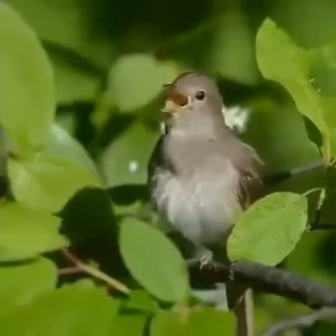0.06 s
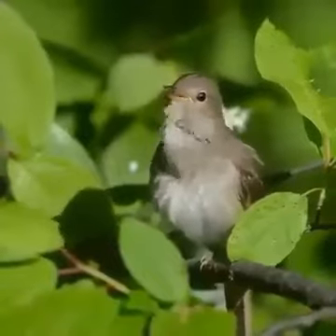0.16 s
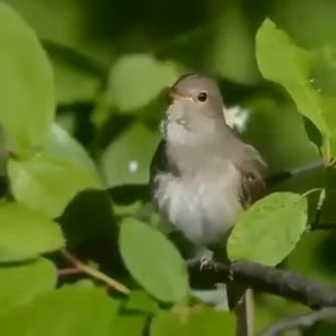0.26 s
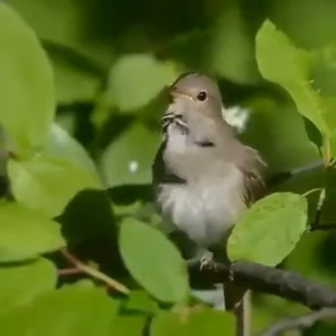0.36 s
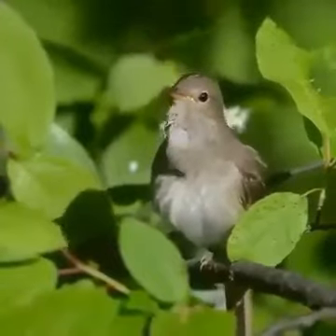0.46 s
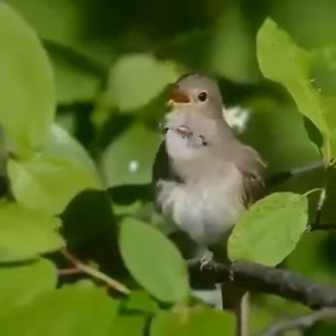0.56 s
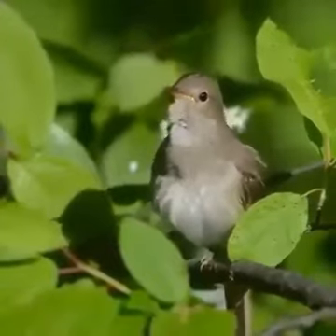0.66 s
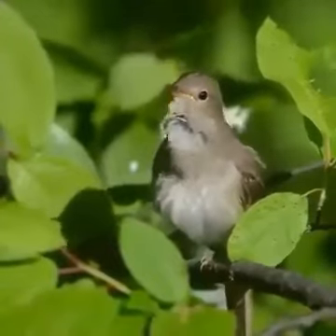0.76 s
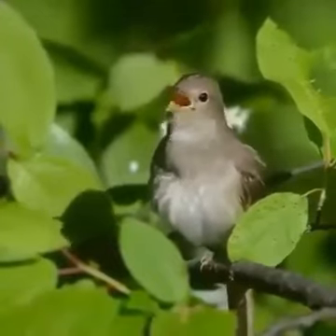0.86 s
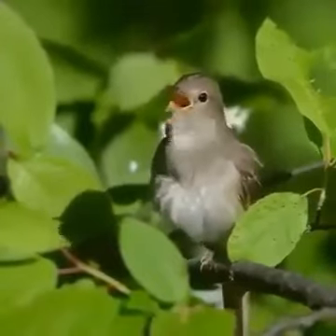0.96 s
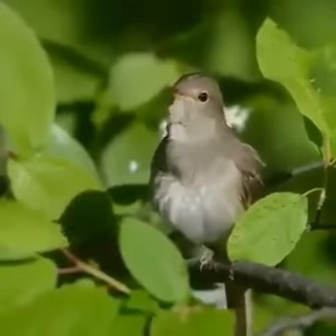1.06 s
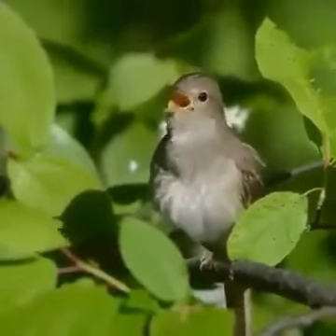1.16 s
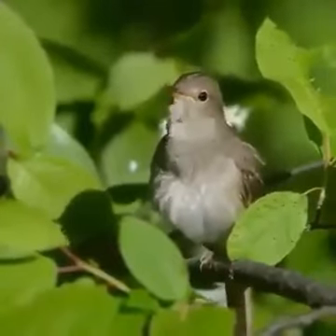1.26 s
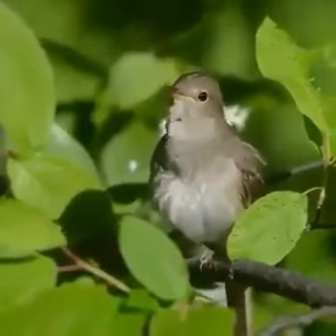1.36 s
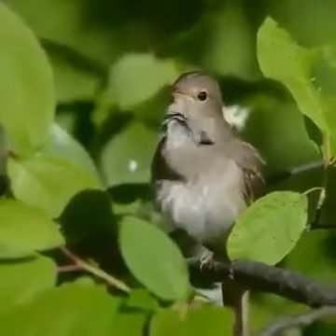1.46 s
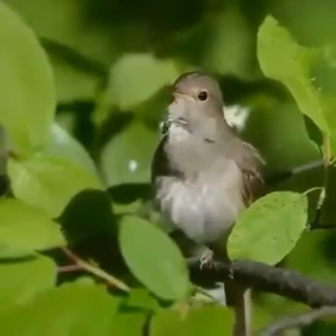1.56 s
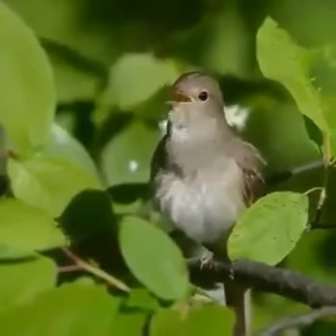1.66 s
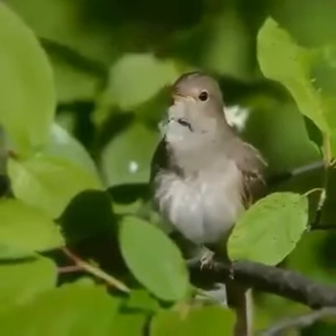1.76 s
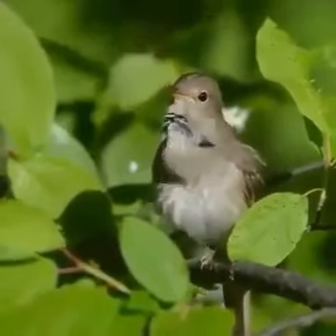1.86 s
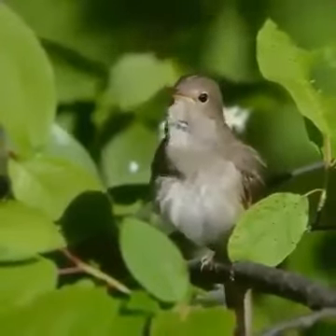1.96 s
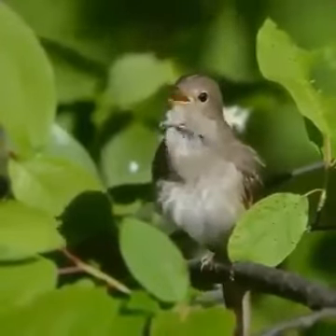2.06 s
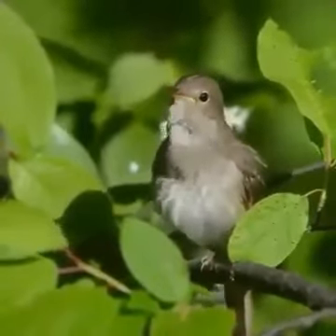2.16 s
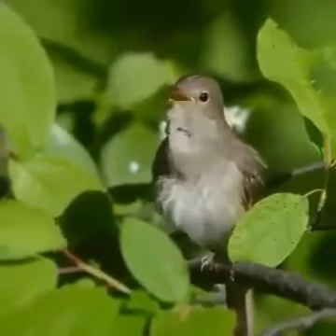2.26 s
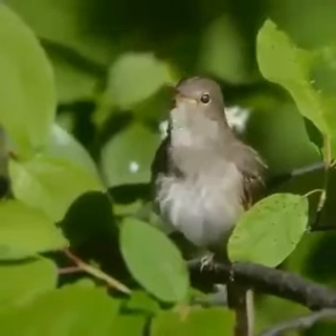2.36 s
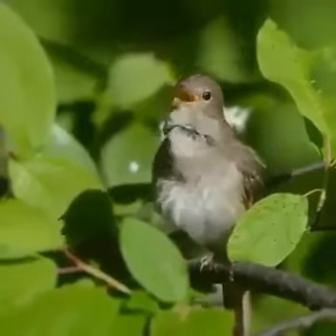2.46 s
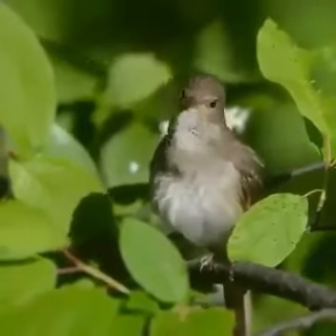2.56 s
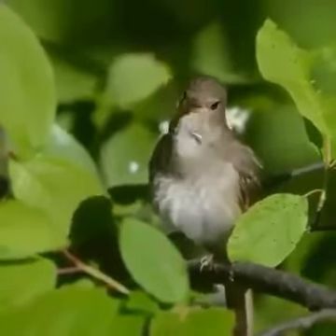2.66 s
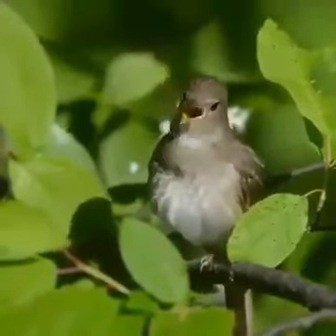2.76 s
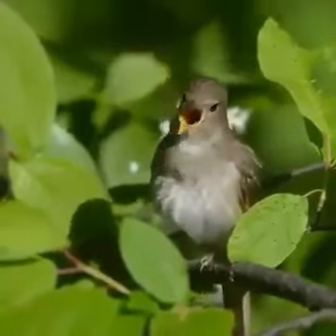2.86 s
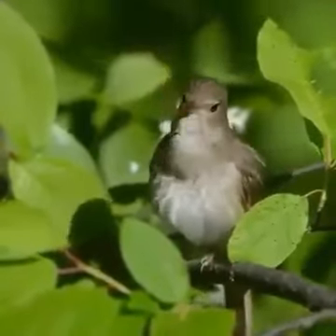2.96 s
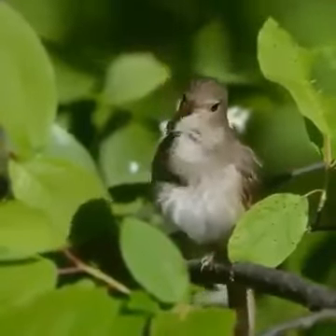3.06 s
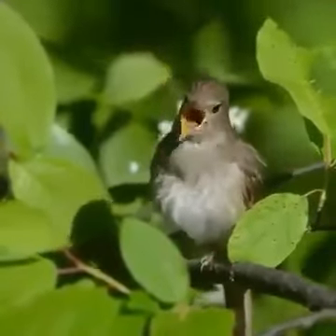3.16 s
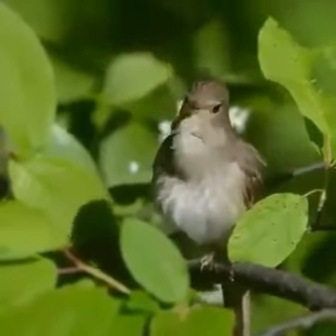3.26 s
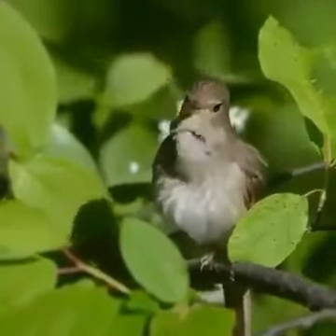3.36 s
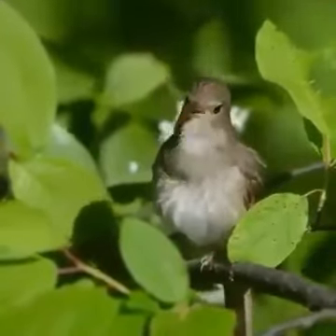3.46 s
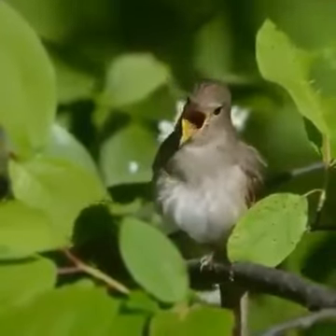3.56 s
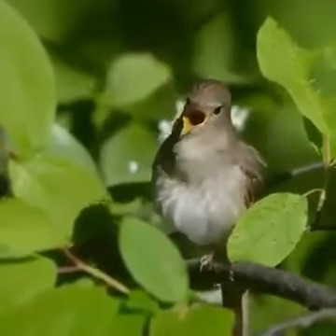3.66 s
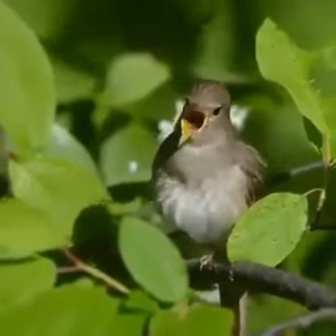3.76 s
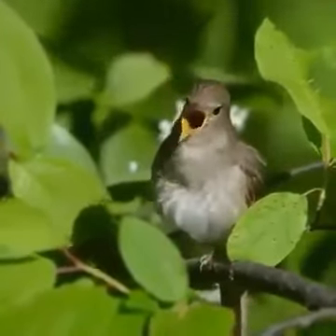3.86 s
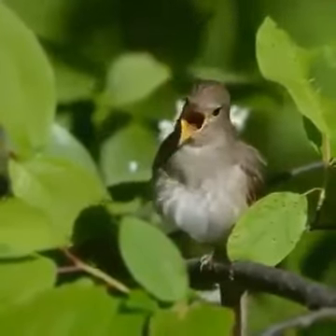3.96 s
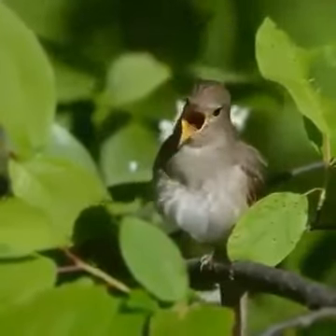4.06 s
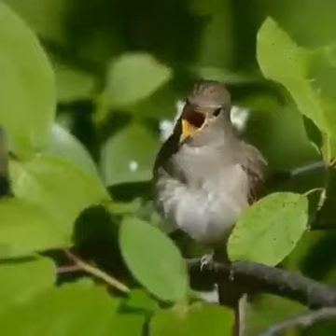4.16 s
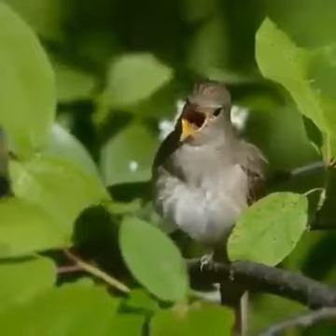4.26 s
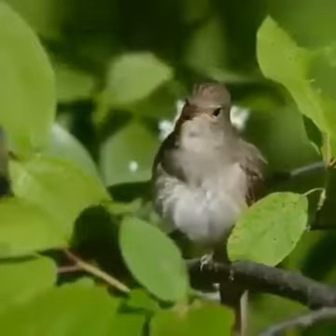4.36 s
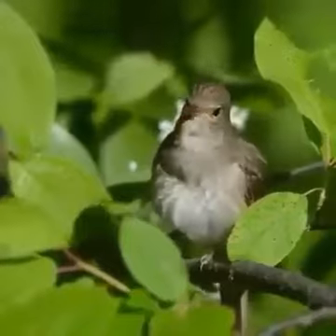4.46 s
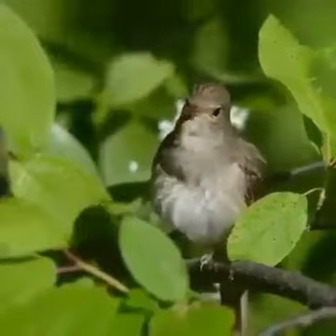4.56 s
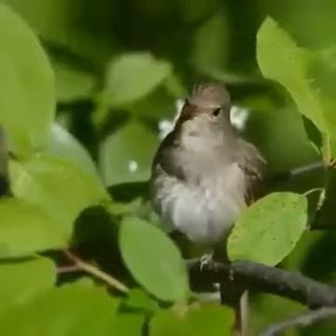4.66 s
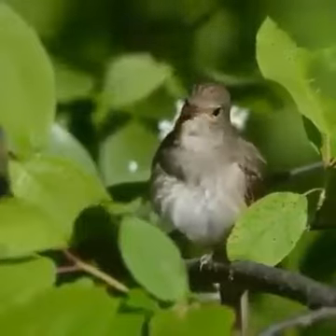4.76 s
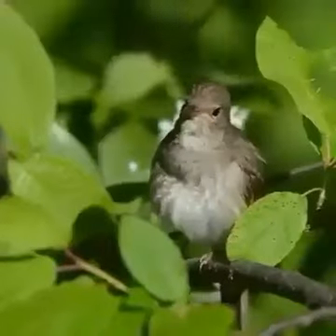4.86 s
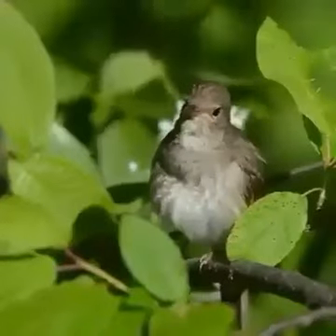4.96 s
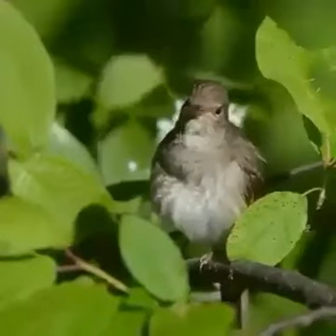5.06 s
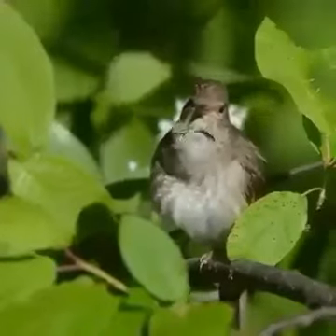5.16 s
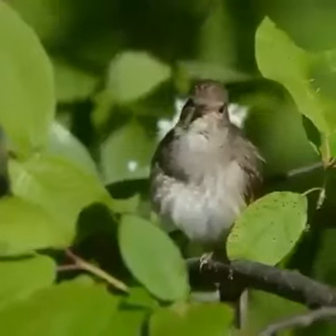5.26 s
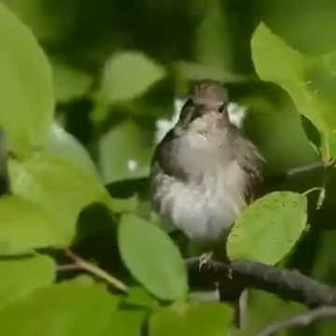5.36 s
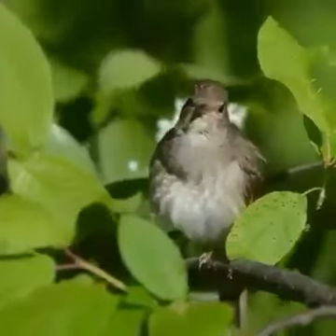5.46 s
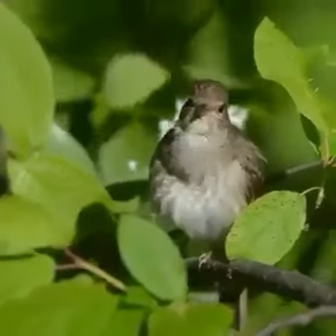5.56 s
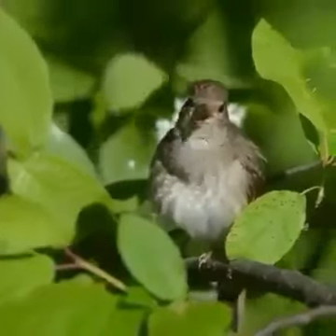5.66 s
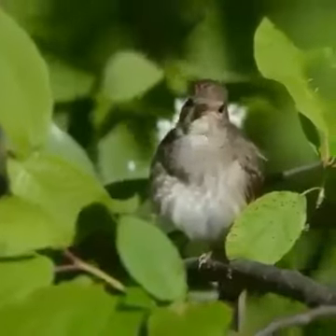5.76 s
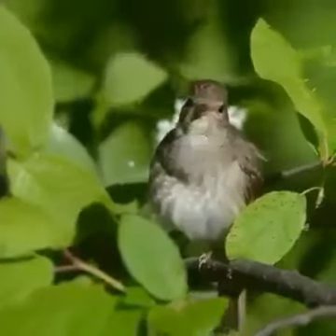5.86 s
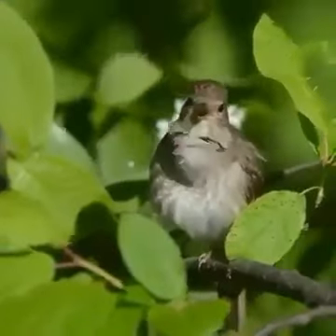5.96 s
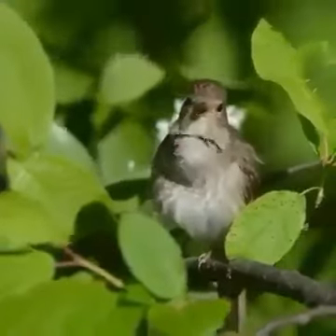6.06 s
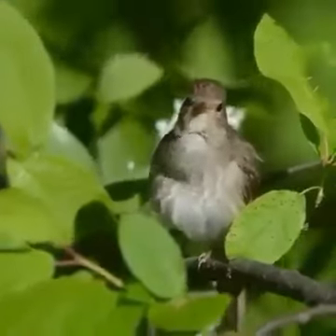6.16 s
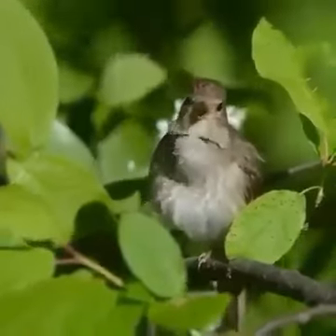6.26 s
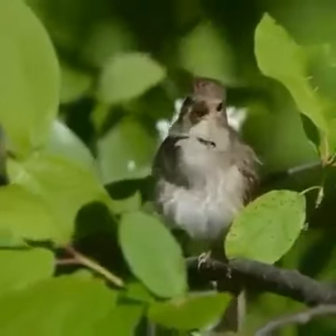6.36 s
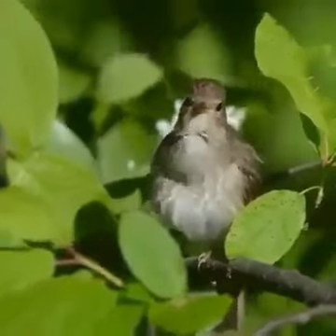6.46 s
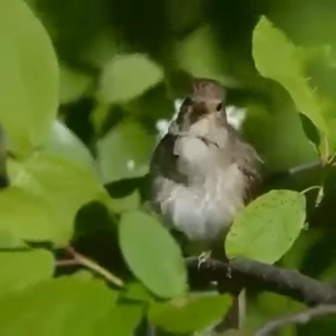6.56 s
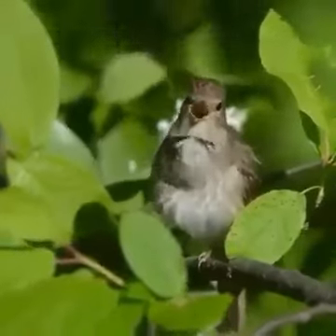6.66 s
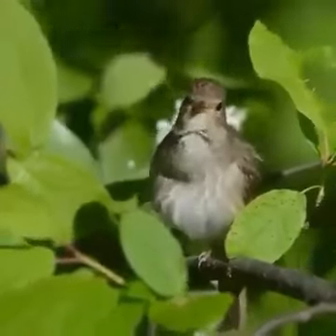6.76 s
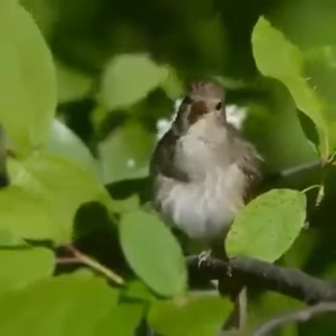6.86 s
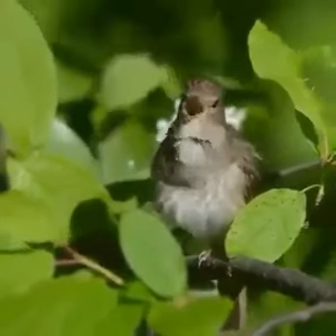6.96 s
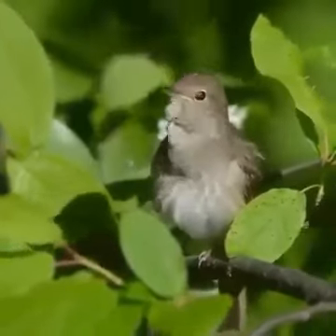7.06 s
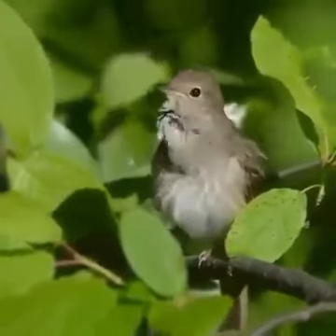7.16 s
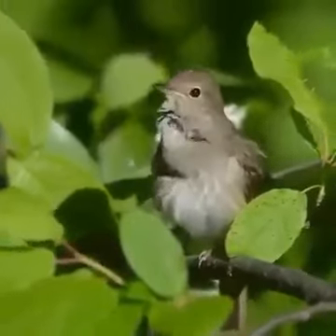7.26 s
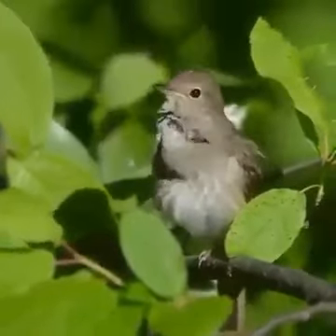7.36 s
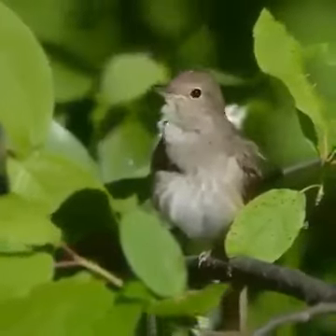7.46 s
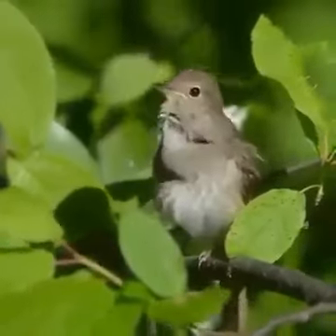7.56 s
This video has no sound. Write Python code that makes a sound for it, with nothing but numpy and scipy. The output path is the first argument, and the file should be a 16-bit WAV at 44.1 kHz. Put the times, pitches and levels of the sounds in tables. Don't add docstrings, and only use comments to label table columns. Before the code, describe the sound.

Close outdoor birdsong through a small camera microphone, its loudest notes slightly overdriven. The first phrase jumps between rounded chirps, bright whipping whistles, hard clicks and noisy buzzing rasps, then four quick groups of rattled clicks and a high sip. A quiet gap reveals faint far birds, soft air and a thin insect band. The second phrase is gentler and cleaner: a rising squeal, then four clear descending pipes and a soft hoot.

```python
import sys
import numpy as np
from scipy import signal
from scipy.fft import rfft, irfft, next_fast_len
from scipy.io import wavfile
from scipy.ndimage import uniform_filter1d

SR = 44100
rng = np.random.default_rng(int(sys.argv[2]) if len(sys.argv) > 2 else 0)


def file_out(sig):
    cols = np.atleast_2d(sig).T
    lim = np.clip(cols, -1, 1)
    pcm = np.round(lim * 32767).astype(np.int16)
    wavfile.write(sys.argv[1], SR, pcm)


def undo_db(level):
    steps = np.asarray(level, float) / 20
    return 10 ** steps


N = 334719
T = np.arange(N) / SR


def unit(x):
    return x / np.sqrt(np.mean(x ** 2) + 1e-20)


def seconds(length_s):
    return np.arange(round(length_s * SR)) / SR


def along(points, hz):
    f, v = np.transpose(points)
    return np.interp(np.log(hz + 1), np.log(f + 1), v)


def filtered(x, response):
    m = next_fast_len(len(x) + 4096)
    return irfft(rfft(x, m) * response(np.fft.rfftfreq(m, 1 / SR)), m)[:len(x)]


def coloured(points):
    return lambda f: undo_db(along(points, f))


def noise(response, size=N):
    return unit(filtered(rng.standard_normal(size), response))


def resonance(hz, width_hz, order=1):
    return lambda f: (1j * f * width_hz / (hz * hz - f * f + 1j * f * width_hz)) ** order


def add(track, s, x):
    part = track[round(s * SR):][:len(x)]
    part += x[:len(part)]


GLIDES = { "tick": ((1600, 942, 4.2), (.017, .002, 0.00087, 2800, 0.0065), -17.5),
          "tock": ((1800, 800, 2.22), (0.02, 0.0017, 0.0044, 1520, 0.003), -16), "hook": ((3030, 880, 3.6),
          (.027, 0.0015, 0.0044, 1900, .003), -29.5), "flick": ((3300, 6940, 1.1),
          (.013, 0.0042, 0.00055, 3500, .002), -6), "sip": ((6630, 8100, -3.5),
          (0.04, 0.019, .004, 420, 0.0046), -34.5), "rise": ((6000, 7760, -5),
          (0.072, 0.066, .008, 300, .008), -27), "fall": ((8000, 5600, -1.6), (0.06, .035, .006, 400, .009),
          -11.5), "pipe": ((2420, 2285, 0.52), (.08, 0.037, 0.024, 100, 0.011), -35),
          "drop": ((3500, 2300, 1.9), (.019, 0.0018, 0.013, 300, 0.0045), -28),
          "settle": ((2290, 2175, 3.5), (0.038, 0.0044, .028, 300, 0.011), -28.5),
          "linger": ((2185, 2215, 1.7), (0.16, 0.0068, 0.023, 120, 0.036), -20), "slide": ((5600, 4000, -2),
          (0.049, 0.034, 0.0035, 900, .005), -6), }


def glide(pitch, effort):
    first_hz, last_hz, bend = pitch
    length, attack, hold, fade_db, release = effort
    at = np.arange(0, length, 1 / 2000)
    moved = np.expm1(-bend * at / length) / np.expm1(-bend)

    def edge(left):
        return -43.5 * np.clip(left, 0, 1) ** 1.78

    level = edge(1 - at / attack) + edge(1 - (length - at) / release)
    level -= fade_db * np.clip(at - attack - hold, 0, 1)
    return at, first_hz + (last_hz - first_hz) * moved, level


# time after the start in seconds, pitch in Hz, level in dB.
ARCH = [(0, 1493, -41.5), (.008, 1580, -11.5), (.03, 1720, 2.5), (.043, 1900, -7.5), (.05, 1680, 4),
        (.056, 1330, -15), (.064, 1200, -14), (.106, 1140, -17), (.114, 1060, -32)]
SWOOP = [(0, 3030, -13), (.003, 3880, -7), (.007, 4663, -0.5), (.012, 4085, -4.5), (.018, 3094, -1),
         (.026, 2502, -8.5), (.036, 2200, -15), (.048, 2066, -6), (.064, 2130, -19)]
CURL = [(0, 2214, -32), (.005, 2302, -10), (.012, 2520, -9), (.017, 2615, -12.5), (.022, 2207, -15),
        (.026, 1800, -12), (.03, 1620, -11.5), (.035, 1360, -30.5), (.038, 1250, -39)]
SEEP = [(0, 7070, -34), (.011, 6950, -15), (.014, 6880, -8.5), (.026, 6764, -1.5), (.035, 6800, -4),
        (.043, 7450, -1.5), (.047, 7690, -10), (.058, 7950, -28.5)]
HOOT = [(0, 1072, -18), (.008, 1126, -9), (.03, 1168, 2), (.115, 1172, 2), (.14, 1134, 1), (.2, 1135, -3),
        (.228, 1096, -2.5), (.244, 1065, -30)]
BENT = {"arch": (ARCH, -36.5), "swoop": (SWOOP, -26), "curl": (CURL, -21),
        "seep": (SEEP, -28), "hoot": (HOOT, -37)}
SYLLABLES = {"chiwoo": [("flick", 0, 2.5), ("swoop", .0046, 0), ("curl", .0686, 0)],
             "tuck": [("tick", 0, -13.5), ("hook", .0265, 0)], "tew": [("drop", 0, 0),
             ("settle", .0165, -7.5), ("linger", .05, -26)]}
PHRASE_ONE = { "tuck": [(.0435, -8.5, 0.95, 0.89), (3.1335, -6, 0.97, 0.91), (3.4955, -5.5, 0.99, 0.98)],
              "tock": [(.8885, -20.5, 0.95, 0.94), (2.3985, -17.5, 0.97, 1.01), (2.796, -19, .99, 1.08)],
              "arch": [(.413, -6, 1.004, 0.88), (1.503, -10, 1.06, 1.01), (1.902, -6.5, 1.001, 1.01)],
              "chiwoo": [(.6225, -4.5, 1, 0.94), (2.1345, -3.5, 1.003, 0.9), (2.528, -3, 1.005, 0.95)],
              "seep": [(1.232, -4.5, 1.001, 0.97)], "slide": [(1.625, -43.5, 1.01, 1.01)],
              "sip": [(4.368, -5.5, 1.003, 0.74)]}
PHRASE_TWO = { "fall": [(5.625, -40.5, 1.01, 0.93)], "rise": [(5.733, -11.5, 1.028, 0.97)],
              "pipe": [(6.06, -9.5, 1.053, 0.9), (6.372, -9.5, 1.018, 0.86), (6.679, -9.5, 1.001, 0.83),
              (6.991, -9.5, 0.99, 0.92)], "tew": [(6.151, -10, 1.02, .95), (6.4625, -9, 0.98, 0.89),
              (6.771, -8.5, 1.001, 0.9), (7.084, -7.5, 0.99, 0.99)], "hoot": [(7.274, -27, 1.001, 0.98)]}


def gestures():
    shapes = {}
    for name, (pitch, effort, breath_db) in GLIDES.items():
        shapes[name] = glide(pitch, effort), breath_db
    for name, (rows, breath_db) in BENT.items():
        shapes[name] = np.transpose(rows), breath_db
    song = []
    for name, notes in {**PHRASE_ONE, **PHRASE_TWO}.items():
        for s, db, higher, longer in notes:
            for part, later, part_db in SYLLABLES.get(name, [(name, 0, 0)]):
                song.append((*shapes[part], s + later * longer, db + part_db, higher, longer))
    return song


# multiple of the pitch, level in dB.
OVERTONES = [(2, -33.5), (3, -46)]


def whistles():
    waver_hz, waver_pitch, waver_db = 47, 0.0036, 0.64
    full_voice_db = -9
    out = np.zeros(N)
    breath = noise(lambda f: 1 / (1 + (f / 1500) ** 2))
    drift, sway = (noise(lambda f: f < waver_hz) for _ in range(2))
    for (at, pitch, level), breath_db, s, db, higher, longer in gestures():
        t = seconds(at[-1] * longer)
        span = slice(round(s * SR), round(s * SR) + len(t))

        def smooth(v):
            return uniform_filter1d(np.interp(t, at * longer, v), size=66, mode="nearest")

        level_db = smooth(level)
        hz = smooth(pitch * higher) * (1 + waver_pitch * drift[span])
        turn = 2 * np.pi * np.cumsum(hz) / SR
        effort = undo_db(level_db + min(db - full_voice_db, 0))
        overtones = sum(undo_db(g) * np.sin(k * turn) for k, g in OVERTONES if k * pitch.min() < 9000)
        tone = np.sin(turn) + effort * overtones
        haze = 1 + undo_db(breath_db) * breath[span]
        add(out, s, np.sqrt(2) * undo_db(db + level_db + waver_db * sway[span]) * tone * haze)
    return out


# first click in seconds, peak level in dB.
TRILL = [(3.6573, -3.5), (3.8318, -2.5), (4.0064, -3), (4.182, -3.5)]
# centre in Hz, width in Hz.
TRILL_THROAT = [
    (3700, 3100),
    (4500, 2600),
]


def trill():
    gap_s, slows_s = .03, 0.0017
    low_db, opening_db, spray_db = -7.5, 9.5, -33.5
    rattle = []
    for s, db in TRILL:
        for k in range(4):
            start = s + k * gap_s + k * (k - 1) / 2 * slows_s
            rattle.append((start, db, low_db + opening_db * (k == 0), spray_db, TRILL_THROAT[k == 0]))
    return rattle


# peak in seconds, level in dB, lower resonance in dB, spray above 8 kHz in dB.
CLICKS = [(0.8615, 2, -8, -33), (1.2344, -19.5, -6.5, -32), (1.7774, -4.5, -6, -19),
          (2.3724, 1.5, -8.5, -55), (2.7696, 1.5, -7, -48)]
# centre in Hz, width in Hz.
CLICK_MODES = [
    (3000, 4000),
    (6400, 2820),
    (10200, 2000),
]


def clicks():
    out = np.zeros(N)
    t = np.arange(SR // 20) / SR - .01
    swelling, away = t < 0, np.abs(t)
    snap = np.exp(-(away / np.where(swelling, .0008, .002)) ** 1.18)
    skirt = np.where(swelling, .03, .12) * np.exp(-away / np.where(swelling, .003, .014))
    puff = snap + skirt
    lone = [(*row, CLICK_MODES[0]) for row in CLICKS]
    for s, db, low_db, spray_db, throat in lone + trill():
        modes = [throat, *CLICK_MODES[1:]]
        bands = [unit(puff * noise(resonance(*mode, order=3), size=len(t))) for mode in modes]
        add(out, s - .009, undo_db(db - 19.5) * (undo_db([low_db, 0, spray_db]) @ bands))
    return out


# peak in seconds, level in dB, width factor, time the first streak passes 5 kHz in seconds.
RASPS = [(0.241, -10.5, 1.1, .204), (1.05, -8.5, 1.1, 1.018), (2.959, -7, 1, 2.922),
         (3.324, -7, 0.99, 3.285)]
# frequency in Hz, level in dB per Hz.
RASP_COLOUR = [(350, -33), (600, -27.5), (1220, -40), (1430, -17.5), (2190, -23.5), (3290, -15.5),
               (3720, -15.5), (6490, -4), (7240, -5.5), (8180, -16), (9900, -14.5), (10900, -28.5),
               (15500, -39.5)]


def rasps():
    climb_s = .051
    rise_s, fall_s, roundness = 0.036, 0.033, 2
    source = undo_db(8.5) * rng.standard_normal(N)
    t = seconds(.078)
    sweep_turn = 2 * np.pi * 1800 * climb_s * np.expm1(t / climb_s)
    for *_, first in RASPS:
        foot = first - climb_s * np.log(5000 / 1800)
        for k, (late, size, phase) in enumerate(rng.random((24, 3))):
            flutter = noise(lambda f: f < 60, size=len(t))
            if k % 6 == 0:
                start, strong_db = foot + k * .00385, 2 - .7 * abs(k - 10)
            else:
                start, strong_db = foot + k * .00385 + .004 * (late - .5), -8 - 5 * size
            streak = np.clip(t / 0.019, 0, 1) * np.sin(sweep_turn + 2 * np.pi * phase)
            add(source, start, undo_db(strong_db + 3 + 4.75 * flutter) * streak)
    source = filtered(source, coloured(RASP_COLOUR))
    out = np.zeros(N)
    for s, db, wider, _ in RASPS:
        span = slice(round((s - 0.063 * wider) * SR), round((s + .056 * wider) * SR))
        away = np.abs(T[span] - s) / (wider * np.where(T[span] < s, rise_s, fall_s))
        swell_db = db - 10 * away ** roundness
        out[span] = unit(source[span]) * undo_db(swell_db) * signal.windows.tukey(len(away), .15)
        out[span] += undo_db(2 * swell_db - 14.0) * noise(resonance(500, 1400), size=len(away))
    return out


# start in seconds, length in seconds, centre in Hz,
# level in dB, pulse rate in Hz.
BUZZES = [(3.623, 0.032, 3343, -11, 496), (3.795, 0.035, 3580, -12, 564.4), (3.968, 0.04, 3260, -12.5, 604),
          (4.148, 0.03, 3420, -11, 686)]
# frequency in Hz, level in dB per Hz.
BUZZ_COLOUR = [(180, -63.5), (300, -40), (2040, -12.5), (2320, -13), (3550, -10), (4690, -9.5),
               (10500, -27.5), (12100, -32.5), (15000, -84)]
# start in seconds, length in seconds, centre in Hz, level in dB.
GRUNT = (2.167, 0.028, 1000, -23)


def buzzes():
    hiss, noisy, speeds_up = 0.59, 0.32, .3
    out = np.zeros(N)

    def arc(t, length):
        return np.sin(np.pi * t / length) ** 1.26

    for s, length, hz, db, rate_hz in BUZZES:
        t = seconds(length)
        jitter = 0.029 * noise(lambda f: f < 250, size=len(t))
        rate = rate_hz * (1 + speeds_up * (t / length - .6) + jitter)
        pulses = np.diff(np.floor(np.cumsum(rate) / SR), prepend=0)
        pulses = pulses * undo_db(3.6 * rng.standard_normal(len(t)))
        source = unit(pulses) + noisy * rng.standard_normal(len(t))
        core = unit(filtered(source, resonance(hz, 900, order=2)))
        breathy = source + 2.1 * rng.standard_normal(len(t))
        wide = unit(filtered(breathy, coloured(BUZZ_COLOUR)))
        rumble = undo_db(-27) * noise(resonance(540, 1600), size=len(t))
        add(out, s, undo_db(db) * arc(t, length) * (unit(core + hiss * wide) + rumble))
    s, length, hz, db = GRUNT
    t = seconds(length)
    add(out, s, undo_db(db) * arc(t, length) * noise(resonance(hz, 1400, order=2), size=len(t)))
    return out


# start in seconds, end in seconds, pitch in Hz, level in dB.
WHINES = [(2.936, 3.2, 10165, -31), (2.95, 3.25, 9470, -42), (3.27, 3.49, 10165, -38),
          (4.16, 4.31, 10165, -39), (6.15, 6.3, 8800, -62)]


def whines():
    out = np.zeros(N)
    for s, end, hz, db in WHINES:
        sinking_db = db - 130 * np.clip(T - s, 0, 1)
        tremble_db = 2.5 * np.sin(2 * np.pi * 14 * (T - s))
        edges = np.clip((T - s) / .004, 0, 1) * np.clip((end - T) / .004, 0, 1)
        out += undo_db(sinking_db + tremble_db) * edges * np.sin(2 * np.pi * hz * T)
    return out


# delay in seconds, level in dB.
TWIGS = [(.00091, -11), (.00207, -8), (.00302, -10), (.0061, -18)]
# frequency in Hz, time to fall 60 dB in seconds.
LEAVES = [(500, .4), (1500, 0.49), (1900, 0.44), (2220, 0.94), (2650, 0.6), (6000, 0.5), (8000, 0.56),
          (12000, 0.1)]


def foliage(x):
    def twigs(f):
        echoes = sum(undo_db(db) * np.exp(-2j * np.pi * f * delay) for delay, db in TWIGS)
        return 1 + echoes / (1 + (f / 5000) ** 4)

    near = filtered(x, twigs)
    out, step = near.copy(), SR // 6
    for start in range(0, N, step):
        hz, t, z = signal.stft(rng.standard_normal(SR // 2), SR, nperseg=256)
        fading = undo_db(-60 * t / along(LEAVES, hz)[:, None]) + undo_db(13 - 60 * t / 0.088)
        tail = signal.istft(z * fading, SR, nperseg=256)[1]
        tail = np.pad(tail / np.linalg.norm(tail), (round(.004 * SR), 0))
        add(out, start / SR, undo_db(-10.0) * signal.fftconvolve(x[start:start + step], tail))
    return out


# start in seconds, length in seconds, first pitch in Hz, last pitch in Hz, level in dB.
FAR_BIRDS = [(5.055, .075, 3800, 3850, -45), (5.11, .085, 4180, 4150, -49), (4.65, .12, 3200, 3350, -52),
             (4.74, .07, 1950, 2050, -56), (4.4, .12, 5600, 5000, -54), (2.085, .045, 3950, 3950, -45),
             (.945, .022, 5850, 5850, -44), (2.3, .04, 5700, 5750, -45), (7.28, .13, 3400, 3300, -52),
             (0, .04, 7300, 7300, -49), (0, .04, 5900, 5900, -50), (5.53, .08, 2750, 2600, -53),
             (1.8, .04, 5800, 4600, -45)]


def far_birds():
    out = np.zeros(N)
    for s, length, first_hz, last_hz, db in FAR_BIRDS:
        t = seconds(length)
        turn = 2 * np.pi * (first_hz * t + (last_hz - first_hz) * t ** 2 / (2 * length))
        flicker = 1 + noise(lambda f: 1 / (1 + (f / 110) ** 2), size=len(t))
        add(out, s, undo_db(db) * signal.windows.tukey(len(t), .5) * flicker * np.sin(turn))
    return out


# frequency in Hz, level in dB per Hz.
HUSH = [(12, -48.5), (20, -18.5), (108, -6), (228, -8), (483, -9.5), (553, -3.5), (804, -12), (969, -10),
        (1700, -13.5), (2160, -11.5), (2470, -11.5), (2680, -10), (7030, -19), (9430, -22.5),
        (12000, -40.5), (15600, -75.5), (22000, -120)]
# centre in Hz, width in Hz, level in dB.
INSECT = (2146, 210, -53.5)


def hush():
    z = signal.stft(rng.standard_normal(N), nperseg=512)[2]
    patches = uniform_filter1d(rng.standard_normal(z.shape), size=3, axis=0)
    patches = uniform_filter1d(patches, size=25, axis=1)
    air = signal.istft(z * undo_db(2.2 * unit(patches)), nperseg=512)[1][:N]
    air = unit(filtered(air, coloured(HUSH)))
    settles_db = 2 * np.clip((T - 4.4) / 0.5, 0, 1)
    hz, width_hz, db = INSECT
    flicker_db = 2.4 * noise(lambda f: f < 12)
    insect = undo_db(db + flicker_db) * noise(resonance(hz, width_hz, order=2))
    return undo_db(-50.5 + 5.5 - settles_db) * air + insect


def scene():
    bird = undo_db(-1.0) * (whistles() + clicks() + rasps() + buzzes())
    return (foliage(bird + far_birds()) + hush())[None]


# first bin and end bin of 172 Hz, trim in dB, ducking under low whistles.
TOP_BANDS = [(46, 52, -2, .3), (52, 61, 0.5, .003), (61, 70, -4, .003), (70, 81, -10.5, .003),
             (81, 92, -16, 0.0036)]


def rebuilt_treble(x):
    lift = 44
    z = signal.stft(x, nperseg=256)[2]
    fill = signal.stft(rng.standard_normal(N), nperseg=256)[2]

    def energy(v):
        return np.abs(uniform_filter1d(np.mean(np.abs(v) ** 2, axis=0), size=5)) + 1e-20

    out = z.copy()
    out[46:] = 0
    whistling = energy(z[7:17])
    for lo, hi, db, duck in TOP_BANDS:
        lifted, grain = z[lo - lift:hi - lift], fill[lo:hi]
        mix = 0.93 * lifted / np.sqrt(energy(lifted)) + .5 * grain / np.sqrt(energy(grain))
        ducked = energy(z[lo:hi]) / (1 + duck * whistling / energy(lifted))
        out[lo:hi] = undo_db(db) * mix * np.sqrt(ducked)
    return signal.istft(out, nperseg=256)[1][:N]


def roll_off(x):
    return signal.sosfilt(signal.butter(12, 15660, fs=SR, output="sos"), x)


def record(dry):
    bent = dry[0] / (1 + np.abs(dry[0] / 0.87) ** 8) ** (1 / 8)
    mix = rebuilt_treble(bent) + whines()
    return roll_off(mix[None])


dry = scene()
out = record(dry)
file_out(out)
```